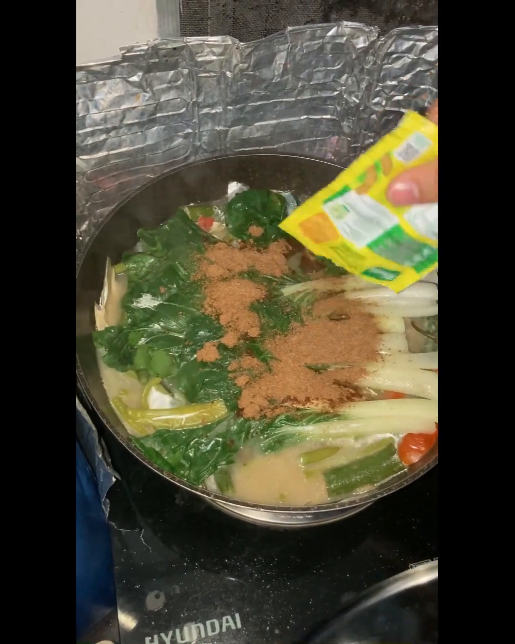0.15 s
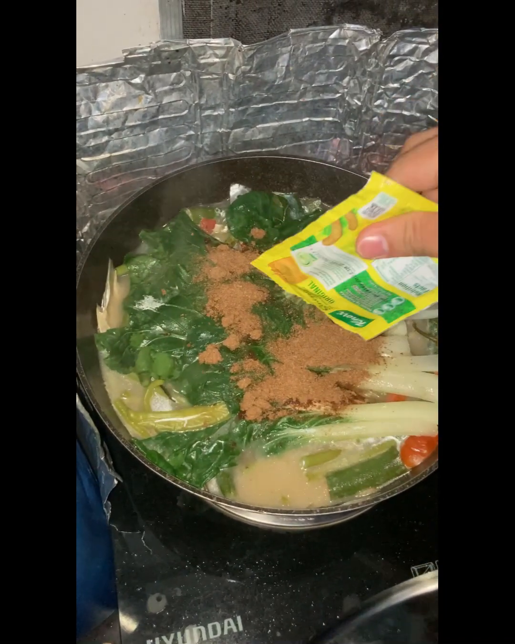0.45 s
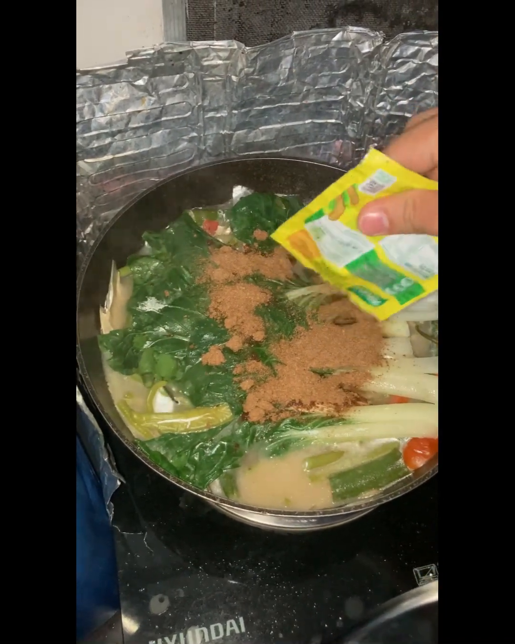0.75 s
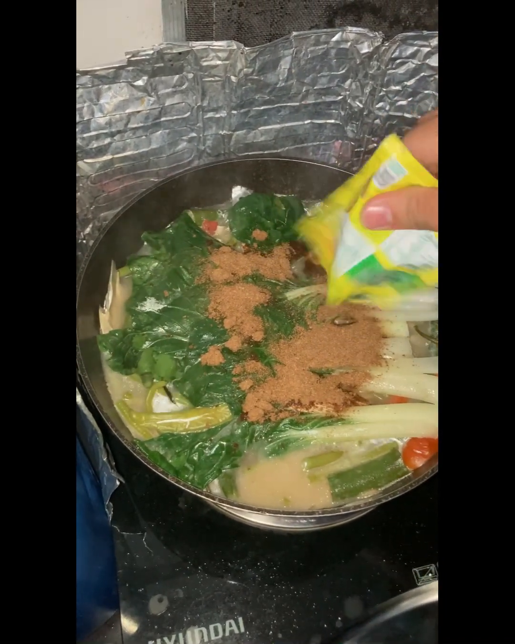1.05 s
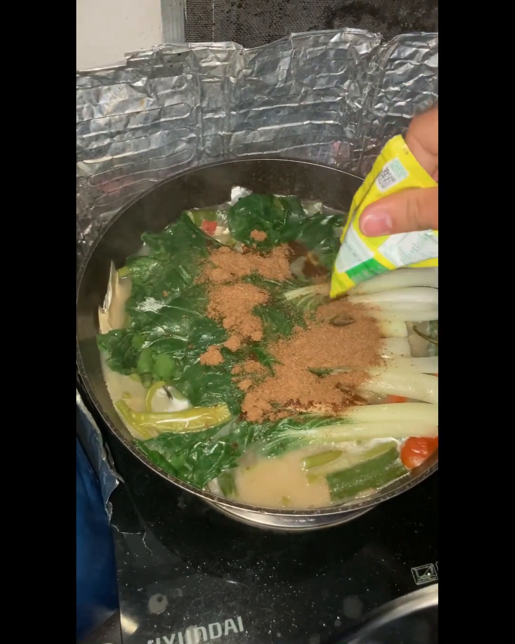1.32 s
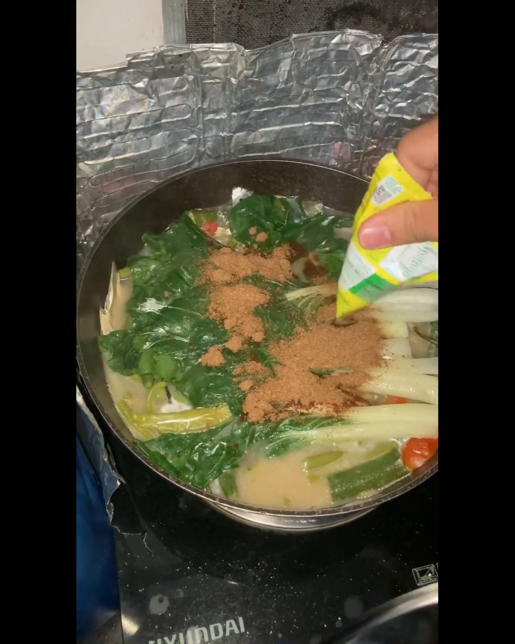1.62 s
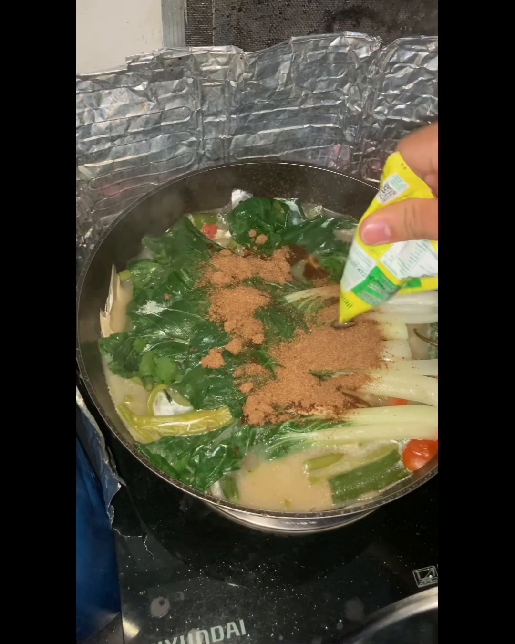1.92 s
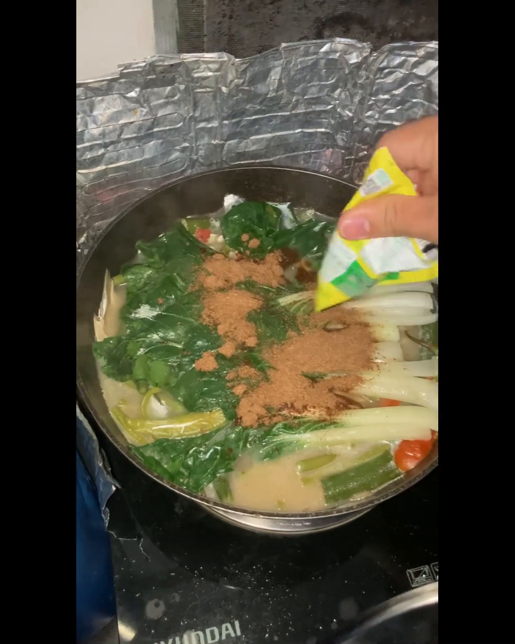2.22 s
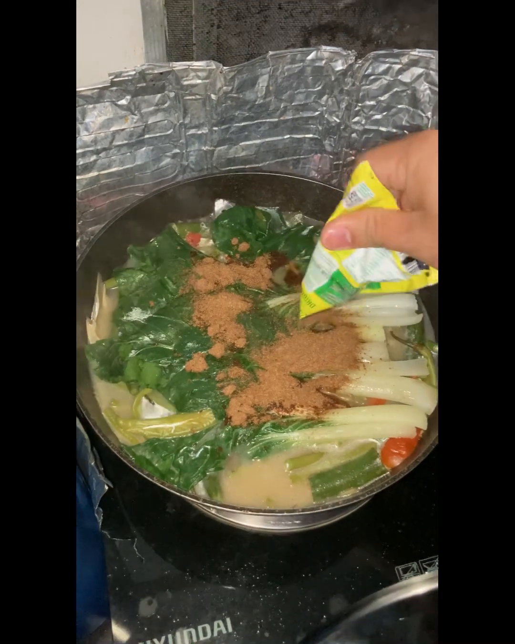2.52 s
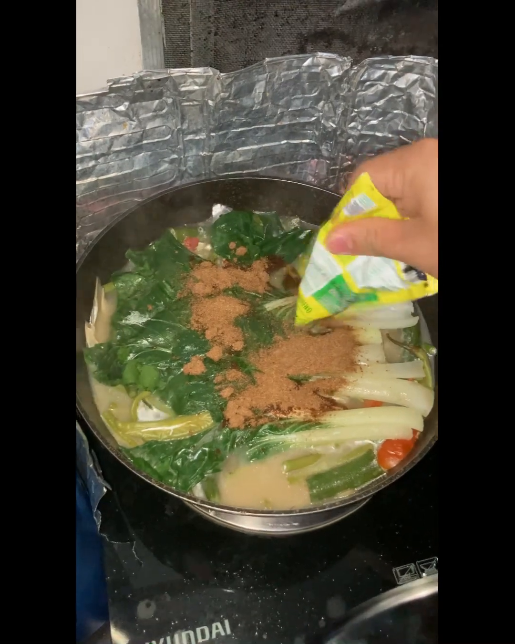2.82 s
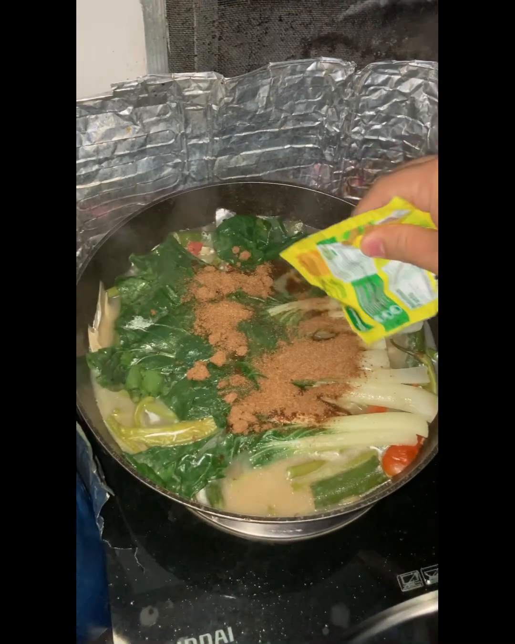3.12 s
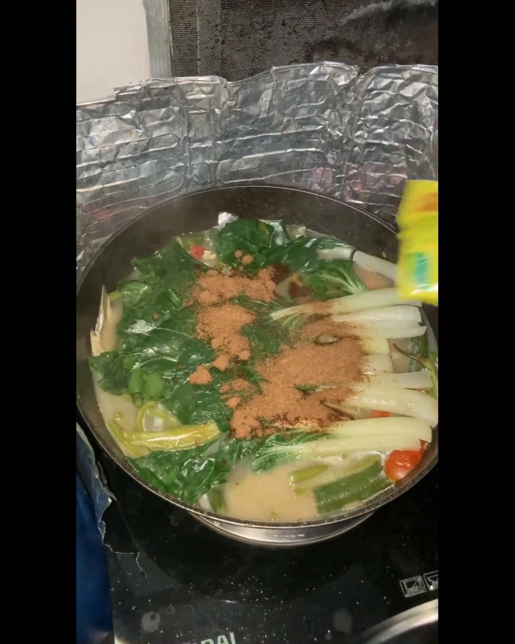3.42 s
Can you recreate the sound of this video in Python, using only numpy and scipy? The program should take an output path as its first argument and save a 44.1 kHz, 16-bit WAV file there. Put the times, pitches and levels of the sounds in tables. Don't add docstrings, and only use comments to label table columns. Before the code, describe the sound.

Plastic packet crackling in fast irregular shakes, with bright snapping creases and fine sliding powder, recorded very close in a kitchen with a short dull tail; it stops near the end over quiet fan rumble and simmering.

```python
import sys
import numpy as np
from scipy import signal
from scipy.fft import rfft, irfft, next_fast_len
from scipy.io import wavfile
from scipy.ndimage import uniform_filter1d

SR = 44100
rng = np.random.default_rng(int(sys.argv[2]) if len(sys.argv) > 2 else 0)


def boost(x):
    u = np.asarray(x, float) / 20
    return 10 ** u


def int16_out(signal):
    q = np.round(np.clip(np.atleast_2d(signal).T, -1, 1) * 32767)
    wavfile.write(sys.argv[1], SR, q.astype(np.int16))


N = 156555

# (frequency [Hz], density [dB per Hz])
FAN_COLOUR = [(30, -23), (65, -4), (105, -1), (150, -5.5), (210, 1.5), (290, -6), (430, -19.5)]
# (frequency [Hz], density [dB per Hz])
SIMMER_COLOUR = [(500, 5), (1000, 2.5), (2000, -10), (9000, -36.5), (16000, -32)]
# (frequency [Hz], left lead [rad])
PORT_PHASE = [(0, 0), (380, -.2), (600, -1.5), (1600, -2.0), (2050, -0.9), (2800, -2.6), (3200, -2.0),
              (4100, -4.0), (5000, -3.35), (5900, -2.85), (14900, 6.3)]
# (frequency [Hz], left minus right [dB])
PORT_BALANCE = [(100, 1.8), (700, 4.0), (1200, -.8), (2400, -1.8), (6000, .2)]
# (frequency [Hz], density [dB per Hz])
FILM_COLOUR = [(300, -5), (1400, -0.5), (2300, -0.08), (4300, 1.69), (10000, 1), (13000, -1.5),
               (16000, -12.5)]
# (frequency [Hz], width [Hz], level [dB])
AIR_MODES = [(1010, 200, -4.5), (1840, 308, 7.5), (2617, 108, 1), (3017, 110, 7)]
# (time [s], level [dB])
HANDLING = [
    (0, -51.5),
    (.46, -48.5),
    (.5, -53),
    (3.2, -49),
    (3.4, -60),
    (3.55, -62),
]
# (start [s], length [s], level [dB])
STROKES = [(0.178, 0.063, -30), (0.317, 0.065, -31), (0.505, 0.081, -25.5), (0.602, 0.027, -52),
           (0.678, 0.099, -26.5), (0.815, 0.12, -27.5), (0.968, 0.047, -40), (1.044, 0.069, -20.5),
           (1.16, 0.087, -23.5), (1.257, 0.054, -38), (1.34, 0.07, -22), (1.428, 0.15, -27),
           (1.601, 0.11, -22), (1.742, 0.14, -23.5), (1.93, 0.086, -22), (2.067, 0.11, -22),
           (2.241, 0.076, -21), (2.366, 0.12, -24.5), (2.557, 0.052, -19.5), (2.666, 0.082, -21.5),
           (2.805, 0.064, -23), (2.893, 0.086, -24), (3.012, 0.057, -20), (3.11, 0.064, -23),
           (3.217, 0.065, -29.5)]
# (time [s], crack peak [dB], panel re crack [dB], panel pitch [Hz])
SNAPS = [(0.0162, -31, -7, 4400), (0.0403, -37.5, -3.5, 3300), (0.1577, -28.5, -9, 4840),
         (0.1788, -27, -2.5, 3060), (0.2185, -29.5, 0, 2900), (0.2328, -18.5, -8, 5000),
         (0.2452, -21, -9, 3440), (0.2779, -30.5, -8, 2940), (0.3588, -34, 0, 900),
         (0.3677, -23, -3, 4500), (0.3792, -18.5, -32, 4400), (0.3978, -22, -13, 3170),
         (0.4108, -14, -9, 4700), (0.4298, -21.5, -5.5, 3040), (0.4457, -35, -6, 2220),
         (0.5346, -23, -5, 3570), (0.5468, -12.5, -6.5, 2300), (0.5656, -24, -8, 4540),
         (0.5991, -30.5, 0, 1090), (0.6117, -33, 4.5, 3500), (0.625, -35, -11, 1700),
         (0.7174, -30, 2.5, 4200), (0.7316, -30, -19, 3470), (0.741, -15.5, -17, 2670),
         (0.762, -31.5, -7, 3530), (0.8329, -22.5, -10, 2870), (0.8478, -43, -6, 3700),
         (0.8637, -31, 4, 3600), (0.8953, -25.5, -3.5, 2500), (0.9215, -18.5, -7, 1800),
         (0.9574, -17.5, -11.5, 4600), (0.97, -17.5, -14, 4930), (0.9804, -43, -7, 5000),
         (0.9928, -35, 0, 1690), (1.0488, -9, -17.5, 2600), (1.0831, -11.5, -11.5, 4700),
         (1.1079, -18.5, -16, 3530), (1.1713, -27, -6, 2860), (1.1964, -22.5, -4, 4660),
         (1.2083, -16.5, -17, 4570), (1.2769, -18, -8, 4300), (1.3118, -27.5, -4.5, 4340),
         (1.3829, -19.5, -5, 2860), (1.3881, -10.5, -7.5, 4400), (1.3954, -26.5, -1, 3900),
                (1.4625, -41, 3.5, 1100), (1.485, -23, -26, 4500), (1.504, -14.5, -7, 3030),
                (1.5102, -12, -4, 1860), (1.5398, -11.5, -11, 4820), (1.5434, -12.5, -8, 4130),
                (1.6085, -30.5, -2, 2300), (1.6507, -22, -5.5, 3080), (1.657, -13, -5.5, 4400),
                (1.6627, -20, -5.5, 3100), (1.677, -16, -23.5, 4200), (1.7332, -27, -10, 2000),
                (1.769, -20.5, -26, 4650), (1.7829, -7, -20, 4230), (1.8044, -22, -23, 4940),
                (1.8098, -20, -12, 3500), (1.8157, -16, -12, 3080), (1.8243, -12.5, -14, 4200),
                (1.8424, -18, -3.5, 4420), (1.8509, -18.5, -7, 2000), (1.8566, -10, -18.5, 2820),
                (1.8906, -20, -9, 4200), (1.938, -25, -15, 4000), (1.9742, -20, -2, 4230),
                (1.982, -16, -9, 4500), (2.005, -15, -9, 4000), (2.0294, -15, -18, 4600),
                (2.0536, -21, -6, 3100), (2.1313, -14, -12.5, 2520), (2.1542, -18, -7, 3580),
                (2.168, -17, -9, 4300), (2.181, -17.5, -1, 2860), (2.2739, -27.5, -2.5, 1920),
                (2.2864, -16, -6, 2820), (2.3043, -14, -10.5, 2040), (2.3097, -18.5, -3, 4650),
                (2.3783, -17.5, -28, 2920), (2.3883, -15.5, -25, 2500), (2.3928, -16.5, -18, 2380),
         (2.4085, -15.5, -9, 2420), (2.4553, -14, -36, 4600), (2.4717, -19, -6, 4330),
              (2.4762, -23.5, -3, 1820), (2.5566, -26.5, -3, 2460), (2.5792, -16, -9, 2000),
              (2.5921, -10, -6, 3920), (2.613, -12.5, -17, 4370), (2.6768, -24, -25, 4700),
              (2.684, -9, -14.5, 4000), (2.6972, -17.5, -5, 4000), (2.7265, -17.5, -6.5, 4480),
              (2.7458, -21.5, -7.5, 4160), (2.8134, -22, -6, 4300), (2.8291, -16.5, -4, 3060),
              (2.8364, -21.5, -10, 4200), (2.842, -15.5, -7, 4180), (2.8486, -11.5, -9, 3050),
              (2.9015, -23.5, -5.5, 3700), (2.918, -23, -17, 5000), (2.9248, -17.5, -28, 4900),
              (2.9449, -16.5, -9, 2540), (2.9591, -16, -5, 4700), (3.0133, -17, -7.5, 3300),
              (3.044, -16, -8, 2930), (3.0508, -12.5, -7, 5000), (3.1134, -23, -7, 4760),
              (3.126, -34, -12, 4700), (3.1347, -20, -19, 4500), (3.1422, -23, -25, 4500),
              (3.1462, -13, -12, 3700), (3.1579, -17, -4.5, 2970), (3.1622, -10, -25, 3100),
              (3.1755, -20.5, -8, 3860), (3.2683, -38.5, 11, 4500), (3.285, -39, 4.5, 4560),
              (3.314, -39, -8, 4500), (3.3376, -39.5, 3.5, 1820), (3.354, -45, -11, 1100),
              (3.362, -39.5, -21, 4340), (3.4307, -42.5, -6, 3800), (3.5103, -47.5, 3.5, 2350)]

FAN_DB, SIMMER_DB = -48, -56.5
ROOM_DB, ROOM_T60_S, ROOM_MOVES_S, WALL_CUT_HZ = -5, 0.078, 0.09, 4160
STROKE_DB, STROKE_RISE_DB, STROKE_FALL_DB = -6, 17, 10.5
STROKE_PEAK_PLACE, STROKE_DECAY_DB_PER_S = 0.52, 334
CRACKLES_PER_S, CRACKLE_SPREAD_DB, CRACKLE_CYCLES = 2000, 2.6, 5.5
CLUMPS_PER_S, CLUMP_DB, PATCH_DB, POWDER_DB, AIR_DB = 60, 3.5, 3, 1, -5
SNAP_DB, CRACK_DB, RAGGED_DB, SNAP_RISE_S = -2.5, 13, 2.5, 0.0012
BURST_T60_S, TAIL_DB, TAIL_T60_S, TINT_DB, TINT_OCTAVES = 0.015, -9, 0.034, 4.5, 0.29
PANEL_DB, PANEL_T60_S, PANEL_PEAK_DB, PANEL_OCTAVES = -1, 0.0159, 10, 0.176


def rms_one(x):
    return x / np.sqrt(np.mean(x ** 2) + 1e-20)


def coloured(x, points):
    hz, db = np.transpose(points)
    grid_hz = np.fft.rfftfreq(4096, 1 / SR)
    outline_db = np.interp(np.log(grid_hz + 1), np.log(hz), db, left=db[0] - 14.5)
    cepstrum = irfft(outline_db * np.log(10) / 20)
    cepstrum[1:2048] *= 2
    cepstrum[2049:] = 0
    impulse = irfft(np.exp(rfft(cepstrum)))
    return signal.fftconvolve(x, impulse)[:N]


def drift(rate_hz):
    r = np.exp(-2 * np.pi * rate_hz / SR)
    slow = signal.lfilter([1], [1, -2 * r, r * r], rng.standard_normal(N + SR))
    return rms_one(slow[SR:])


def resonance(x, hz, width_hz):
    r = np.exp(-np.pi * width_hz / SR)
    zeros = np.array([1, 0, -1]) * (1 - r * r) / 2
    poles = [1, -2 * r * np.cos(2 * np.pi * hz / SR), r * r]
    return signal.lfilter(zeros, poles, x + 1e-18)


def bump(freq_hz, hz, db, octaves):
    return boost(db * np.exp(-(np.log2(freq_hz / hz) / octaves) ** 2))


def ports(x):
    size = next_fast_len(N + 4096)
    hz = np.fft.rfftfreq(size, 1 / SR)
    lead_rad = np.interp(hz, *np.transpose(PORT_PHASE))
    at_hz, db = np.transpose(PORT_BALANCE)
    half = boost(np.interp(np.log(hz + 1), np.log(at_hz), db) / 2)
    gains = np.array([half * np.exp(1j * lead_rad), 1 / half])
    return irfft(rfft(x, size) * gains, size)[:, :N]


def fan_and_simmer():
    outline = FAN_COLOUR + [(2000, -30.5), (20000, -45.5)]
    fan, *spread = [rms_one(coloured(w, outline)) for w in rng.standard_normal((3, N))]
    simmer = rms_one(coloured(rng.standard_normal(N), SIMMER_COLOUR)) * boost(SIMMER_DB + 2 * drift(22))
    return ports(boost(FAN_DB) * fan + simmer) + boost(FAN_DB - 21.5) * np.array(spread)


def kitchen(x):
    hop = int(ROOM_MOVES_S * SR)
    t = np.arange(SR // 8) / SR
    out = np.zeros((2, N + SR))
    for i in range(0, N, hop):
        tails = rng.standard_normal((2, len(t))) * boost(-60 * t / ROOM_T60_S) * (t > .002)
        tails = tails / np.sqrt(np.sum(tails ** 2) / 2)
        wet = signal.fftconvolve(x[None, i:i + hop], tails, axes=1)
        out[:, i:i + wet.shape[1]] += wet
    return signal.sosfilt(signal.butter(1, WALL_CUT_HZ, fs=SR, output="sos"), out[:, :N])


def hollow(x):
    modes = enumerate(AIR_MODES)
    return sum((-1) ** k * boost(db) * resonance(x, hz, width) for k, (hz, width, db) in modes)


def effort():
    t = np.arange(N) / SR
    power = boost(2 * np.interp(t, *np.transpose(HANDLING)))
    shape_db = [-STROKE_RISE_DB - 10 * STROKE_DECAY_DB_PER_S, -STROKE_RISE_DB, 0,
                -STROKE_FALL_DB, -STROKE_FALL_DB - STROKE_DECAY_DB_PER_S]
    for s, length, db in STROKES:
        times = [s - 1, s, s + length * STROKE_PEAK_PLACE, s + length, s + length + 1]
        power = power + boost(2 * (db + STROKE_DB + np.interp(t, times, shape_db)))
    return np.sqrt(power)


def snaps():
    top, body = np.zeros(N + SR), np.zeros(N + SR)
    size, lead = 2048, 128
    t = (np.arange(size) - lead) / SR
    freq = np.fft.rfftfreq(size, 1 / SR) + 1
    after = np.maximum(t, 0)
    burst_rise = np.clip(1 + t / SNAP_RISE_S, 0, 1) ** 2
    panel_rise = np.clip(1 + t / (2 * SNAP_RISE_S), 0, 1) ** 2
    burst_decay = boost(-60 * after / BURST_T60_S) + boost(TAIL_DB - 60 * after / TAIL_T60_S)
    panel_band = 1 / (1 + (freq / 5000) ** 4) / (1 + (500 / freq) ** 2)
    core = np.exp(-(t / .0007) ** 2)
    rows = SNAPS
    for (s, db, panel_db, hz), (a, b, c) in zip(rows, rng.standard_normal((len(rows), 3, size))):
        ragged = boost(RAGGED_DB * rms_one(uniform_filter1d(c, size=30)))
        burst = a * ragged * burst_rise * burst_decay
        burst[lead:lead + 2] += boost(CRACK_DB) * np.array([1, -1]) * np.sign(a[0])
        tint = bump(freq, 8000 * 2 ** (0.35 * b[0]), TINT_DB, TINT_OCTAVES)
        burst = irfft(rfft(burst) * tint, size)
        panel = irfft(rfft(b) * bump(freq, hz, PANEL_PEAK_DB, PANEL_OCTAVES) * panel_band, size)
        panel = panel * panel_rise * boost(-60 * after / PANEL_T60_S)
        burst_rms = np.sqrt(np.average(burst ** 2, weights=core))
        panel_rms = np.sqrt(np.average(panel ** 2, weights=core ** 0.144) * 2)
        i = int(s * SR) - lead
        top[i:i + size] += boost(db + SNAP_DB) * burst / burst_rms
        body[i:i + size] += boost(db + panel_db + PANEL_DB) * panel / panel_rms
    bright = signal.sosfilt(signal.butter(2, 3500, "high", fs=SR, output="sos"), top[:N])
    return coloured(bright + body[:N], FILM_COLOUR) + boost(-1.5) * hollow(body[:N])


def crackle():
    clump = boost(CLUMP_DB * drift(CLUMPS_PER_S))
    sizes = boost(CRACKLE_SPREAD_DB * np.minimum(rng.exponential(1, N), 4)) * rng.choice([-1, 1], N)
    clicks = sizes * (rng.random(N) < CRACKLES_PER_S / SR)
    dealt = rng.integers(0, 16, N)
    rings = np.zeros(N)
    for k, hz in enumerate(np.geomspace(600, 15000, 16)):
        patch = boost(PATCH_DB * drift(4.6))
        rings += resonance(clicks * (dealt == k) * patch, hz, hz / CRACKLE_CYCLES)
    powder = boost(POWDER_DB) * rng.standard_normal(N)
    grains = rms_one(rms_one(rings) + powder) * clump * effort()
    return coloured(grains, FILM_COLOUR) + boost(AIR_DB) * 2 * hollow(grains)


def scene():
    sachet = crackle() + snaps()
    return ports(sachet) + boost(ROOM_DB) * kitchen(sachet) + fan_and_simmer()


def roll_off(x):
    return signal.sosfilt(signal.butter(12, 16970, fs=SR, output="sos"), x)


def record(dry):
    rounded = np.tanh(dry)
    mix = signal.sosfilt(signal.cheby2(16, 50, 16600, fs=SR, output="sos"), rounded)
    return roll_off(mix)


dry = scene()
out = record(dry)
int16_out(out)
```